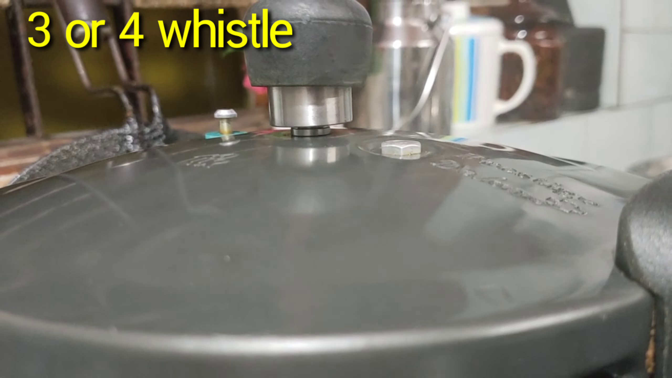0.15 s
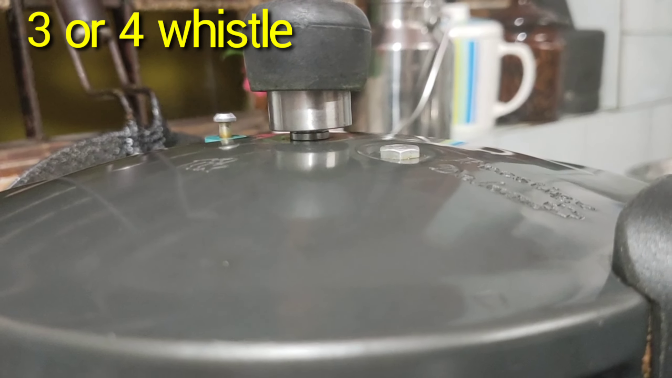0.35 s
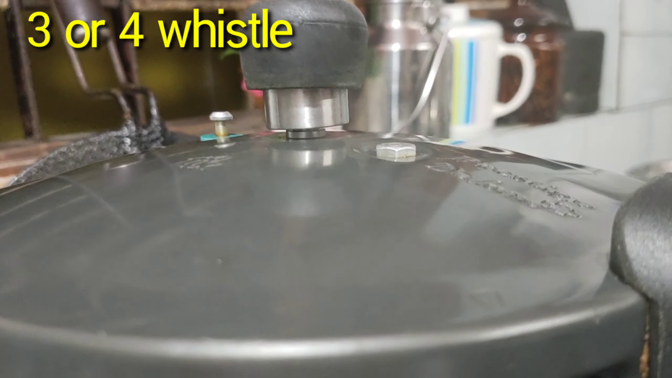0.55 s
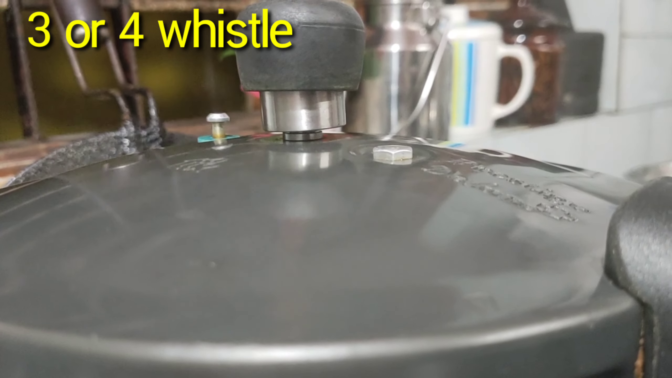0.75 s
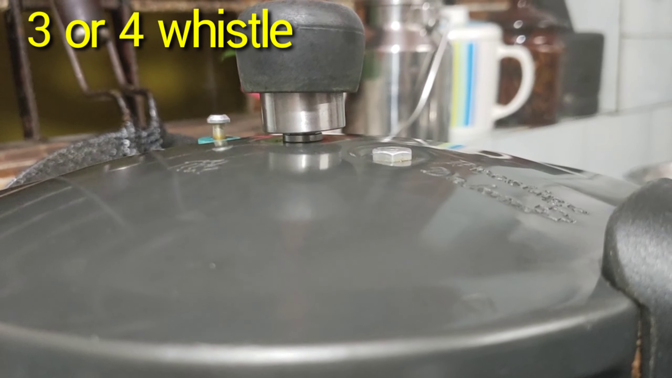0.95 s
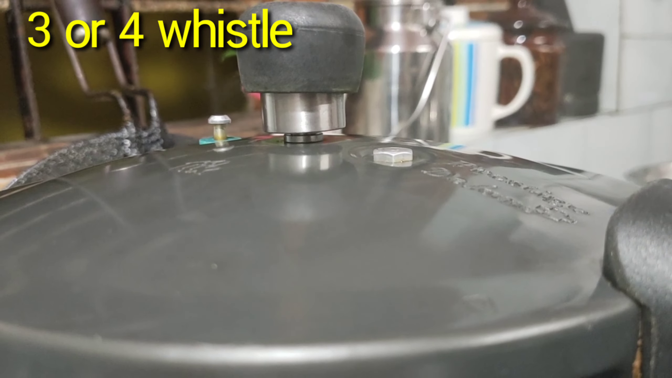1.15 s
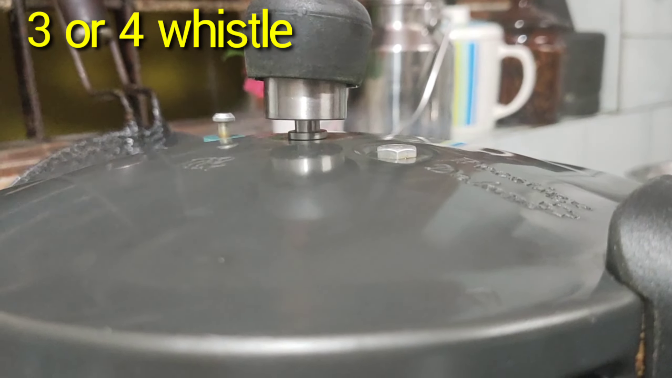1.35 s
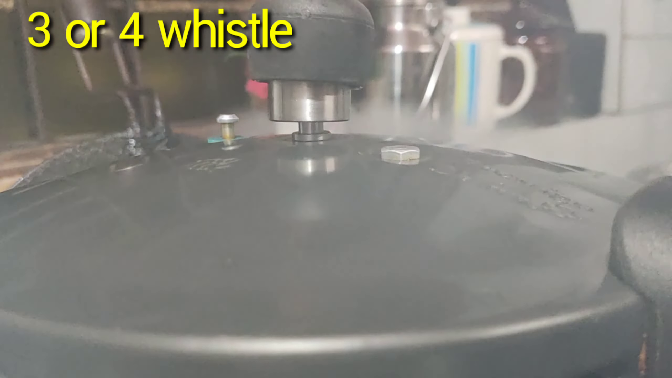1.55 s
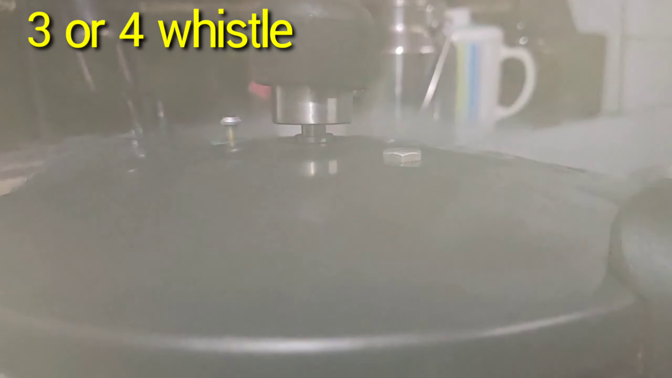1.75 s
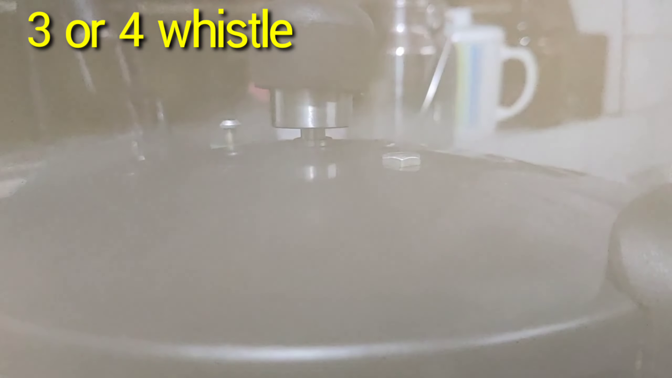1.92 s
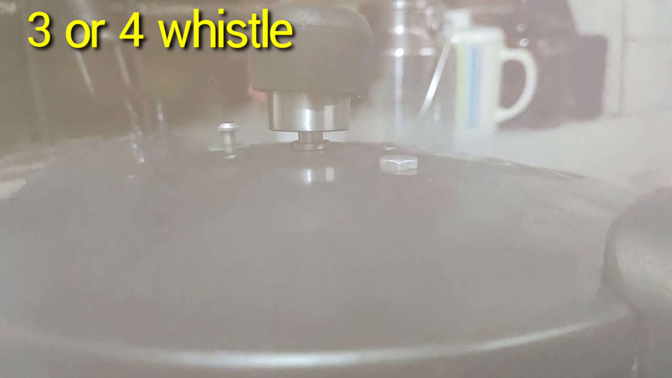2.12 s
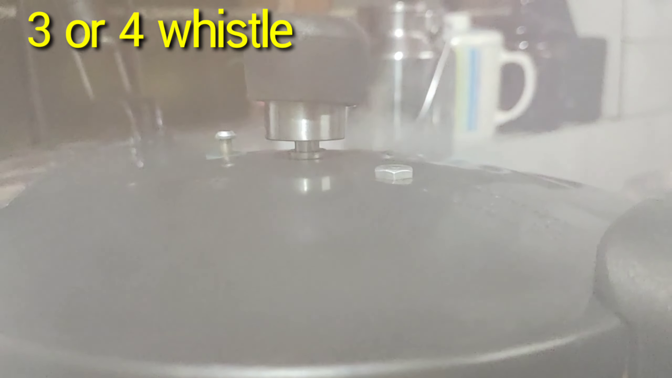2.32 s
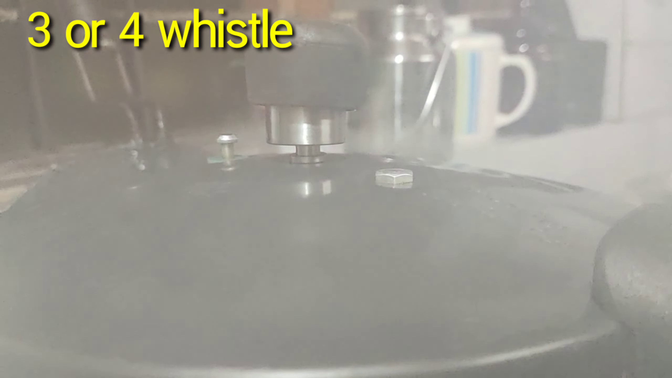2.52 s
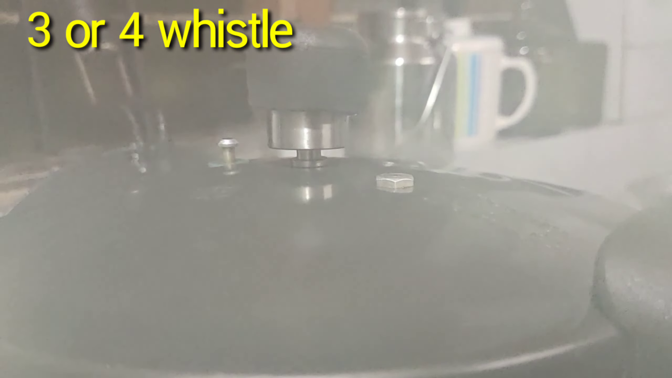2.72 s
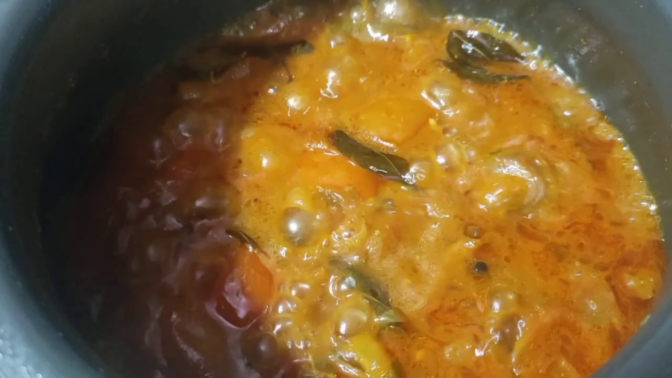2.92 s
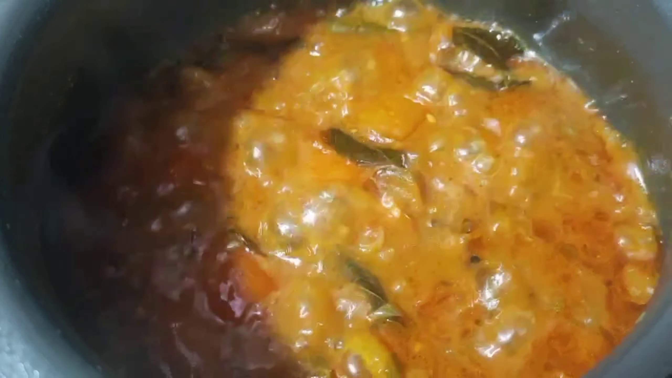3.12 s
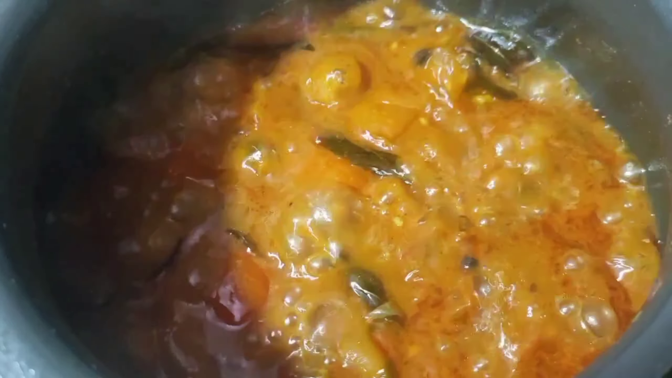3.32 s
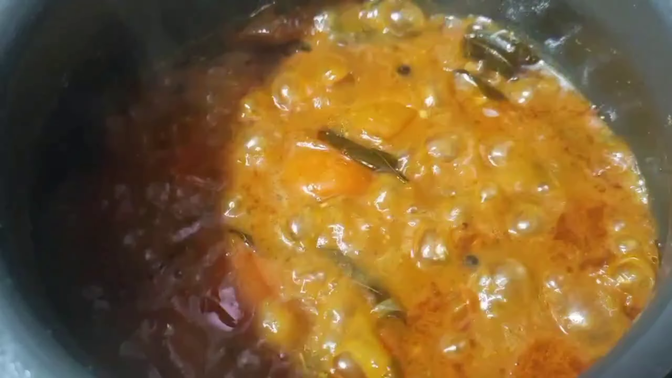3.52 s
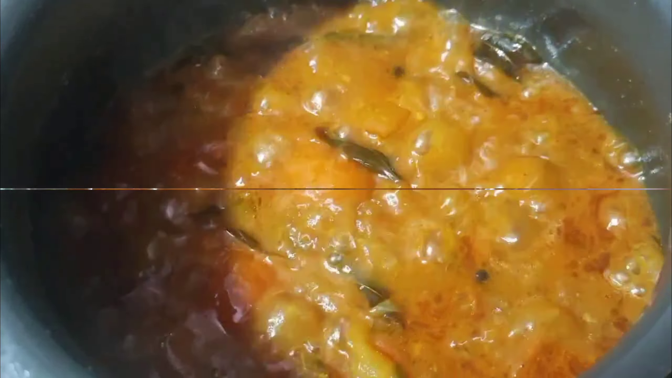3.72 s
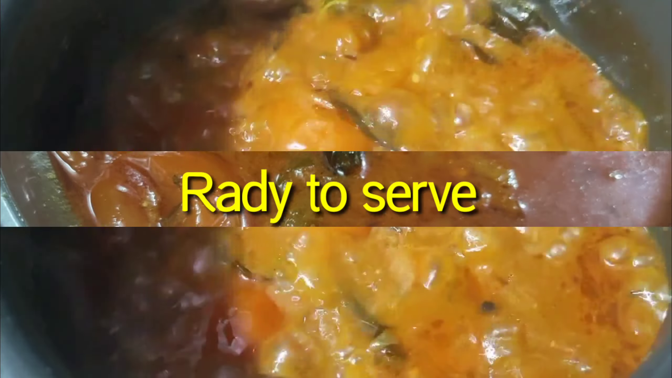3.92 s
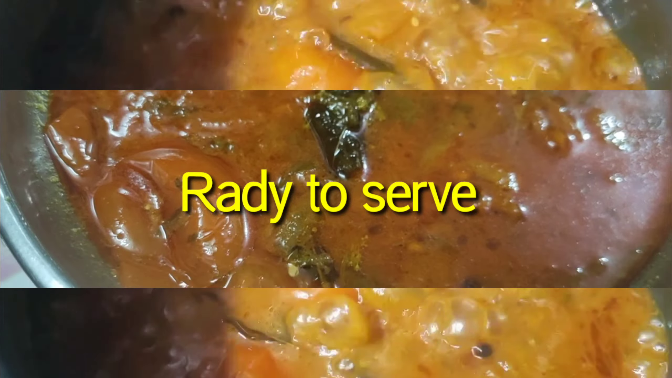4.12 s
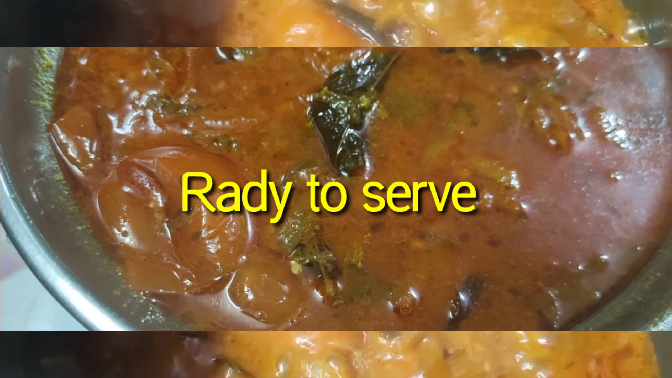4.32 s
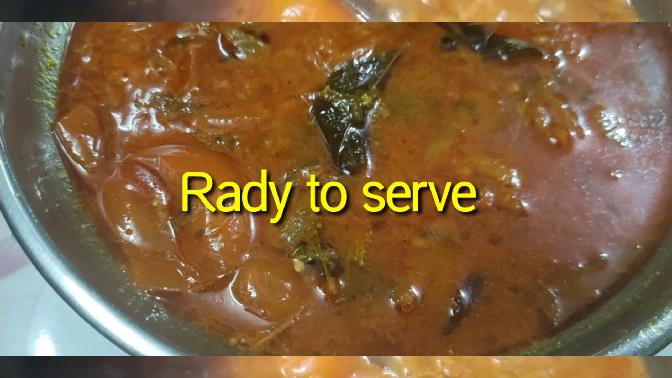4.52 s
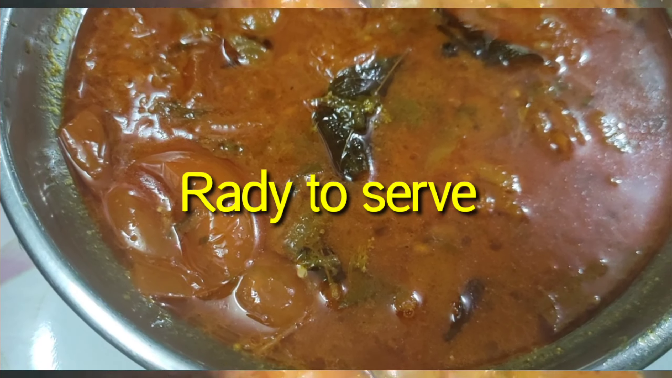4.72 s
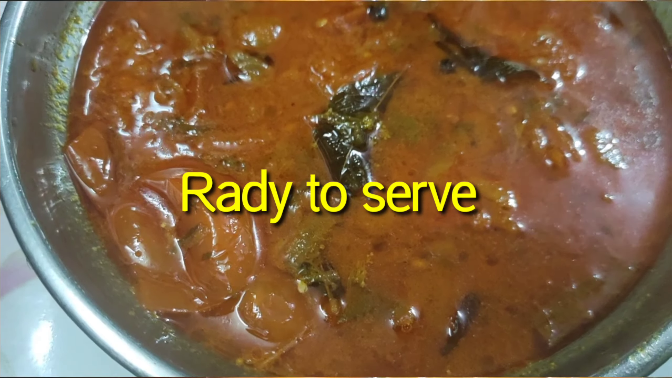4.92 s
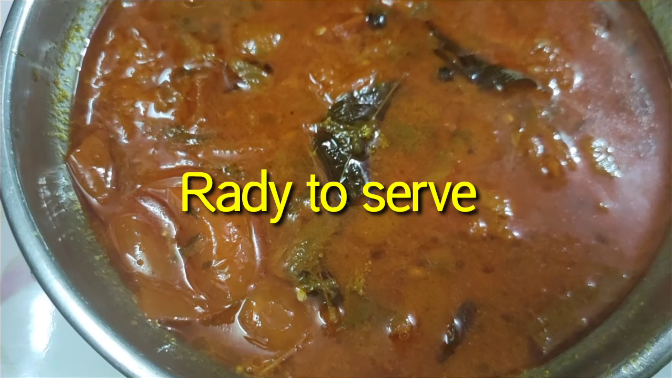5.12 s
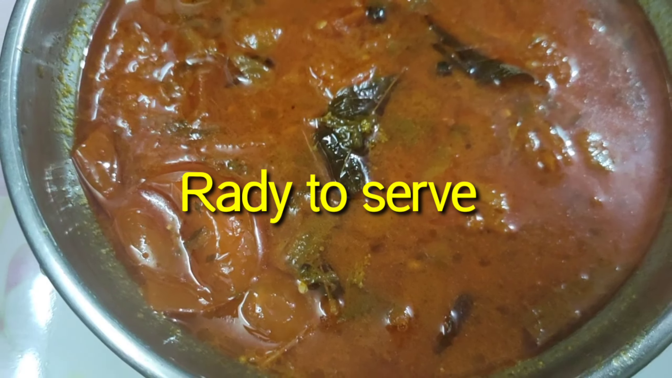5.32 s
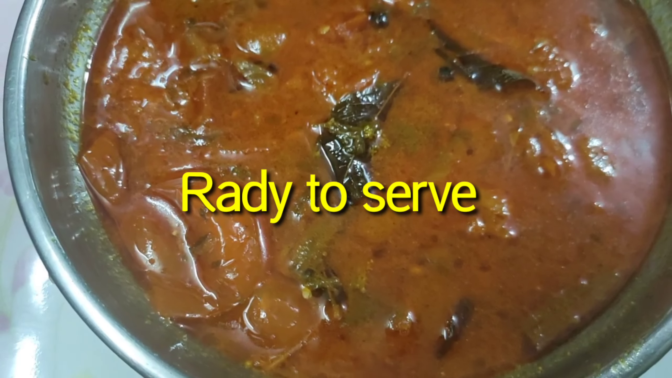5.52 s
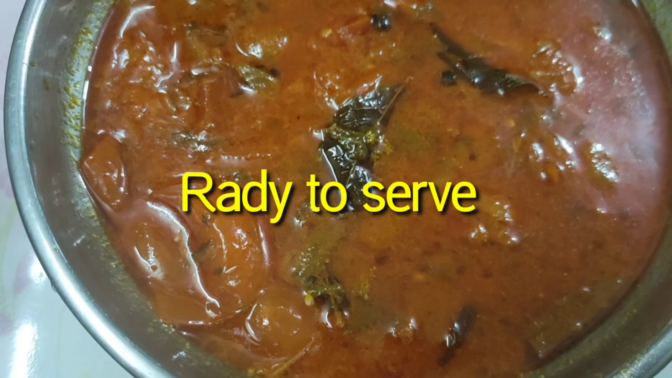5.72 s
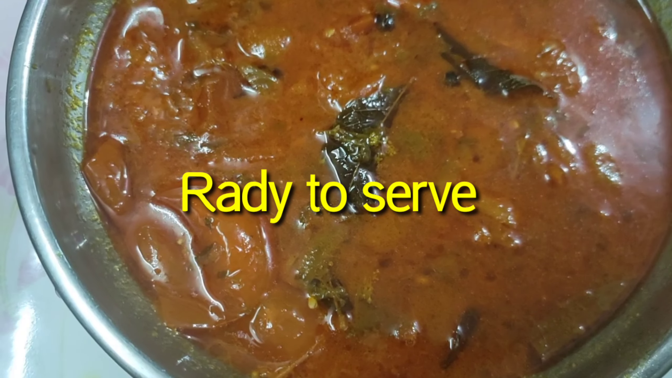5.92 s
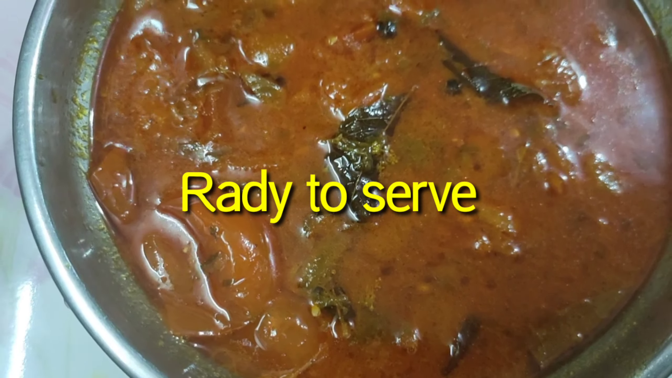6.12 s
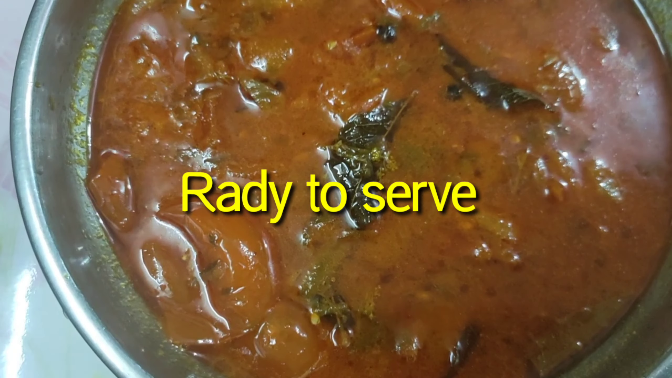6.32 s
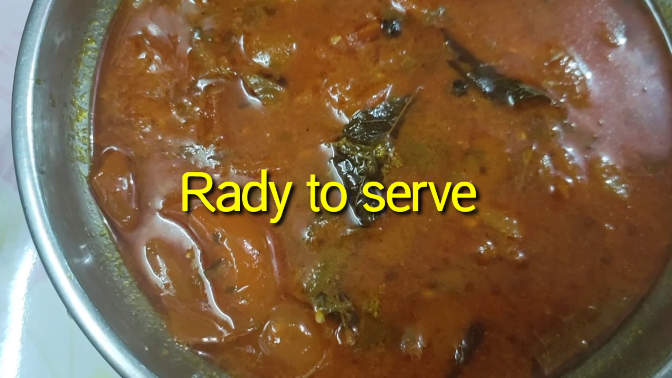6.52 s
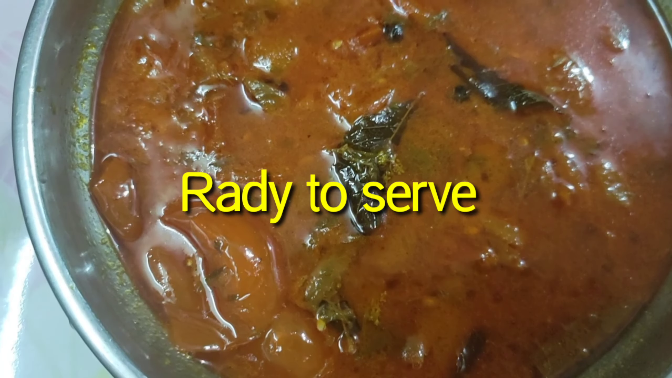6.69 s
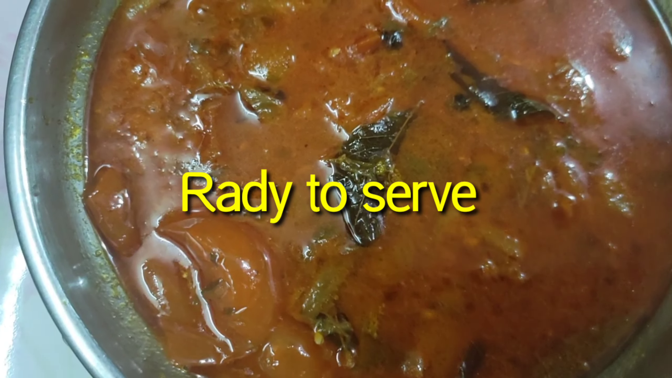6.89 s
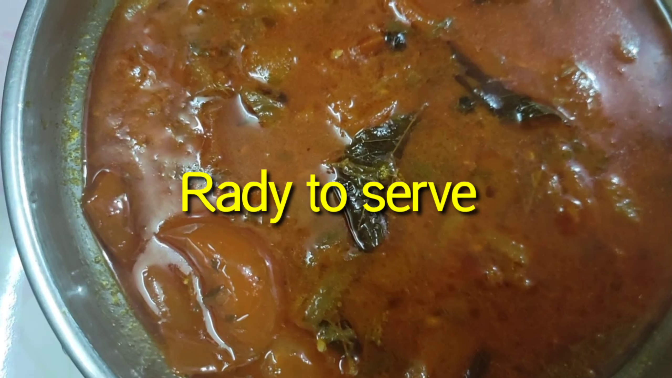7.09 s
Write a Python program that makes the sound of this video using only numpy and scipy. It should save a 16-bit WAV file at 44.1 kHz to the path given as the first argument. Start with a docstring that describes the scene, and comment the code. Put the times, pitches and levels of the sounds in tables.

```python
"""Pressure cooker and open curry pot

A pressure cooker hisses over a droning burner; its weight lifts with a puff and steam blows a shrill whistle.
The jet is coloured noise sounding the vent's resonances; the drone is noise in low resonances.
After a cut and a short silence, curry boils with plops and spits, each a ringing bubble, then fades.
Out in the street an engine hums and a horn toots three times, ever louder, both built from sines.
A fan hums throughout, and filtered noise makes the kitchen air and the stove flame.
"""
import sys
import numpy as np
from scipy import signal
from scipy.fft import rfft, irfft
from scipy.io import wavfile
from scipy.ndimage import uniform_filter1d

SR = 44100
rng = np.random.default_rng(int(sys.argv[2]) if len(sys.argv) > 2 else 0)


def output_pcm(signal):
    """Save a mono or channel-first signal as 16-bit PCM at the path in sys.argv[1].

    Samples are clipped to [-1, 1] before scaling.
    """
    pcm = np.clip(np.atleast_2d(signal).T, -1, 1) * 32767
    wavfile.write(sys.argv[1], SR, np.round(pcm).astype(np.int16))


N = 315315
TIME = np.arange(N) / SR
FREQS = np.maximum(np.arange(N // 2 + 1) * SR / N, 1)
CUTOFF_HZ = 15480   # top of the sound


def from_db(db):
    """Decibels to gain."""
    return 10 ** (np.asarray(db) / 20)


def rms_one(x):
    """Scale so that the middle of the stereo image has rms 1."""
    return x / np.sqrt(np.mean(np.atleast_2d(x).mean(axis=0) ** 2) + 1e-20)


def in_time(rows):
    """Each column of a curve at every sample."""
    s, *columns = np.transpose(rows)
    return [np.interp(TIME, s, c) for c in columns]


def at_hz(points, hz=FREQS):
    """Read a spectrum on a log-frequency axis."""
    f, value = np.transpose(points)
    return np.interp(np.log(hz), np.log(f), value)


def colour(points):
    """Gain of a spectrum, falling steeply past its ends."""
    below = 1 + (points[0][0] / FREQS) ** 8
    above = 1 + (FREQS / points[-1][0]) ** 8
    return from_db(at_hz(points)) / np.sqrt(below * above)


def resonances(peaks):
    """Gain of a set of resonances whose powers add."""
    power = 0
    for hz, width, db in peaks:
        detuning = (FREQS / hz - hz / FREQS) * hz / width
        power = power + from_db(db) ** 2 / (1 + detuning ** 2) ** 1.8
    return np.sqrt(power)


def filtered(x, gain):
    """Apply a gain per frequency."""
    return irfft(rfft(x) * gain, N)


def noise(gain, likeness):
    """Stereo noise of a given colour and left-right likeness; rms 1."""
    alike = np.clip(likeness, -.95, .999)
    mid = filtered(rng.standard_normal(N), gain)
    side = filtered(rng.standard_normal(N), gain * np.sqrt((1 - alike) / (1 + alike)))
    return rms_one(mid + side * [[1], [-1]])


def drift(rate):
    """Random wander of spread 1; a higher rate in Hz wanders faster."""
    return rms_one(filtered(rng.standard_normal(N), 1 / (1 + (FREQS / rate) ** 2)))


def ring(clicks, hz, t60):
    """A unit click sets a sine of starting height 1 ringing, 60 dB down after t60 seconds."""
    r, w = from_db(-60 / (t60 * SR)), 2 * np.pi * hz / SR
    return signal.lfilter([0, np.sin(w)], [1, -2 * r * np.cos(w), r * r], clicks + 1e-18)


def add(out, s, sound):
    """Mix a short stereo sound in at time s."""
    i = int(s * SR)
    out[:, i:i + sound.shape[-1]] += sound[:, :N - i]


def echoes(x, t60, wet_db):
    """Dense reflections that die away, different at each ear."""
    t = TIME[:int(t60 * SR)]
    tail = rng.standard_normal((2, len(t))) * from_db(-60 * t / t60)
    tail /= np.sqrt(np.sum(tail ** 2, axis=1, keepdims=True))
    return x + from_db(wet_db) * signal.fftconvolve(np.atleast_2d(x), tail, axes=1)[:, :N]


LIFT_S, LIFT_TAKES_S = 1.104, 0.097   # the weight starts to rise; time until the vent is open
WHISTLE_DB, HISS_DB, RUSH_DB = -21, -22, -38   # base levels, shifted over time below
WHISTLE_CATCH_DB = 31.5   # the whistle is this much weaker while the vent is barely open
GUST_DB, GUST_S = 7, 0.082   # extra rush around the moment the vent opens; its time constant
SINK_S, SINK_DB, SINK_TAKES_S = 3.028, 11, .045   # the blow sinks: when, how far at most, time constant
# steam leaking under the seated weight: (time [s], relative level [dB])
LEAK_FLOW = [(0, -27), (.05, -26), (.33, -26), (.44, -23.5), (.51, -26.5), (.62, -23), (.7, -24.5),
             (1.1, -24.5)]
# colour of the leak: (frequency [Hz], relative density [dB per Hz])
LEAK_HISS = [(250, -16), (500, -22.5), (1070, -14), (1300, -19.5), (1600, -18), (2650, -15.5), (3100, -7),
             (4200, -11), (5400, -7.5), (7900, -6.5), (9700, -12), (11600, -13), (13000, -5.5),
             (14300, -11), (15500, -7)]
# resonances of the narrow gap: (frequency [Hz], width [Hz], relative level [dB])
GAP_RESONANCES = [(4630, 170, -9), (5910, 160, -3), (6500, 60, -4.5), (6600, 80, -1.5), (7000, 140, -6),
                  (7330, 250, -5), (7820, 340, -2), (13100, 360, -4.5)]
# colours of the jet's hiss and low rush: (frequency [Hz], relative density [dB per Hz])
JET_HISS = [(880, -45.5), (1500, -16), (2050, -14), (2330, -4.5), (2520, -7), (3280, -1.5), (3580, -7),
            (4020, -11.5), (4660, -13.5), (5500, -15.5), (6400, -15.5), (6900, -13), (7350, -14.5),
            (7950, -13.5), (10200, -23.5), (11900, -23.5), (13300, -13.5), (14200, -15), (15500, -18.5)]
JET_RUSH = [(100, -22.5), (230, -13.5), (300, -9), (420, -9), (700, -5), (1400, -1), (1550, -1),
            (2000, -17)]
# resonances of the vent and the hollow weight: (frequency [Hz], width [Hz], relative level [dB])
VENT_RESONANCES = [(1927, 35, -12.5), (1997, 30, -14), (2240, 70, -15), (2370, 60, -8.5), (2690, 80, -8),
                   (2801, 55, -2), (2964, 40, -1), (3038, 40, -0.5), (3173, 40, 1.5), (3275, 90, 0.5),
                   (3390, 40, 2.5), (3616, 35, -8), (3830, 110, -11), (4009, 35, -13), (4138, 35, -13),
                   (4314, 50, -14), (4590, 80, -9), (4680, 80, -10.5), (4986, 35, -14)]
# shifts within the jet: (time [s], whistle above 2.5 kHz [dB], whistle below it [dB], hiss [dB], low rush [dB])
JET_BALANCE = [(1.3, -1.6, 4, 0.3, -0.5), (1.65, 0, -7.5, -0.7, 2), (1.8, -1.5, 5.5, 0, -3),
               (2.15, -1.2, 0.5, 0.5, -3.5), (2.45, -1.5, 0.5, 0.8, -2.5), (2.56, -0.5, -1.5, 0, 1.5),
               (2.8, 3, -2, 1, 1), (3.02, 2, -2.5, 1, 3.5)]
# stereo spread: (time [s], width factor [-])
STEAM_WIDTH = [(0, 1.2), (2.4, 1.05), (2.62, 0.12), (3.12, 0.083)]
# tilt of the stereo image: (frequency [Hz], left minus right [dB])
STEAM_BALANCE = [(60, -9.5), (99, -5.5), (160, 1), (270, 3), (450, 0), (740, 1), (1220, 1), (2010, -1),
                 (3330, 5.5), (5700, 2), (7500, 6.5), (8700, 1), (15000, 0)]
# phase between the sides: (frequency [Hz], lead of the left [radians])
STEAM_PHASE = [(200, -0.022), (1100, 0.55), (2300, 0.055), (3200, -0.65), (4500, -0.25), (7000, -0.36)]


def steam():
    """The thin leak gives way to the full jet, whose turbulence sounds the vent's resonances."""
    (leak_db,), (spread,) = in_time(LEAK_FLOW), in_time(STEAM_WIDTH)
    shrill_db, hollow_db, hiss_db, rush_db = in_time(JET_BALANCE)
    lifted = np.clip((TIME - LIFT_S) / LIFT_TAKES_S, 0, 1)   # 0 is seated, 1 is open
    sunk_db = SINK_DB * (1 - np.exp(-np.maximum(TIME - SINK_S, 0) / SINK_TAKES_S))
    gust_db = GUST_DB * np.exp(-np.abs(TIME - LIFT_S - LIFT_TAKES_S) / GUST_S)
    whistle_db = WHISTLE_DB - WHISTLE_CATCH_DB * (1 - lifted)

    gap = np.hypot(colour(LEAK_HISS), from_db(3.5) * resonances(GAP_RESONANCES))
    leak_likeness = at_hz([(1000, 0.9), (3000, 0.2), (7000, 0.19), (13000, 0.112)])
    leak = from_db(leak_db - 1.24 + 1.48 * drift(6.9)) * noise(gap, leak_likeness)

    vent = noise(resonances(VENT_RESONANCES), 0.88)
    hollow = filtered(vent, 1 / (1 + (FREQS / 2520) ** 48))
    tones = from_db(hollow_db) * hollow + from_db(shrill_db) * (vent - hollow)
    whistle = from_db(whistle_db + 0.7 * drift(32)) * tones

    roar = colour(JET_HISS) * from_db(at_hz([(1800, -3), (3100, -4.5), (5200, -1.0)]))
    hiss_likeness = at_hz([(2000, 0.35), (4500, 0.18), (7500, 0.51), (13000, 0.16)])
    hiss = from_db(HISS_DB + hiss_db + 0.83 * drift(27)) * noise(roar, hiss_likeness)
    rush = from_db(RUSH_DB + rush_db + gust_db + 1.4 * drift(30)) * noise(colour(JET_RUSH), 0.64)

    # reflections from the lid and the wall tiles comb the hiss
    combed = echoes(np.sqrt(1 - lifted ** 2) * leak + lifted * hiss, t60=.1, wet_db=-5.0)
    jet = (combed + lifted ** 2 * (whistle + rush)) * from_db(-sunk_db)
    centre = jet.mean(axis=0)
    jet = centre + spread * (jet - centre)   # the image narrows late in the blow
    half = np.array([[.5], [-.5]])   # half of each difference goes to each side
    return filtered(jet, from_db(at_hz(STEAM_BALANCE) * half) * np.exp(1j * at_hz(STEAM_PHASE) * half))


# the weight lifts: (time [s], relative level [dB])
PUFFS = [(1.192, -29.5), (1.201, -18.5)]
# dull tones of the thump: (frequency [Hz], relative level [dB], time to fall 60 dB [s])
PUFF_MODES = [(63.8, -6.5, 0.064), (120, -23, 0.058), (284, -4, 0.028), (710, 4.5, 0.0048),
              (1300, -16, .012)]


def puff():
    """The first gusts from under the weight thump dully, as clicks ringing short tones."""
    kicks = np.zeros(N)
    for s, db in PUFFS:
        kicks[int(s * SR)] = from_db(db)
    thump = sum(from_db(db) * ring(kicks, hz, t60) for hz, db, t60 in PUFF_MODES)
    return echoes(thump, t60=.12, wet_db=-8.5)


DRONE_DB, DRONE_DROP_DB, DRONE_FADE_S = -36.5, 19, 0.089   # the drone falls back once the vent is open
# resonances of the drone: (frequency [Hz], width [Hz], relative level [dB])
DRONE_PEAKS = [(67.3, 24, -3), (92, 22, -5), (129.3, 11, -0.5), (157, 9.8, 0.5), (178.7, 15, -5.5)]


def burner():
    """The flame drones in a few low resonances."""
    dropped = np.clip((TIME - LIFT_S - LIFT_TAKES_S) / DRONE_FADE_S, 0, 1)
    bed = from_db(-33.0) / (1 + (FREQS / 90) ** 2)
    return from_db(DRONE_DB - DRONE_DROP_DB * dropped) * noise(resonances(DRONE_PEAKS) + bed, 0.99)


def bubbling(spectrum, per_s, cycles, size_db, largest, clump_db):
    """Small bubbles burst at random, in clumps, each ringing a few cycles at its own pitch and place."""
    at = np.flatnonzero(rng.random(N) < per_s * from_db(clump_db * drift(14)) / SR)
    count = len(at)
    sizes = from_db(size_db * np.minimum(rng.exponential(1, count), largest)) * rng.choice([-1, 1], count)
    sizes = sizes * from_db(rng.normal(0, 3.4, count) * np.array([[1], [-1]]))   # place from left to right
    # the right ear is farther
    late = np.minimum(at + (rng.uniform(0, 0.00019, count) * SR).astype(int), N - 1)
    pitches = np.geomspace(spectrum[0][0], min(spectrum[-1][0], CUTOFF_HZ), 24)
    dealt, out = rng.integers(0, len(pitches), count), 0
    for k, hz in enumerate(pitches):
        clicks = np.zeros((2, N))
        mine = dealt == k
        clicks[0, at[mine]] = sizes[0, mine]
        clicks[1, late[mine]] = sizes[1, mine]
        # high bubbles are brief and cover a wide band, so they need more height
        out = out + hz * from_db(at_hz(spectrum, hz)) * ring(clicks, hz, cycles / hz)
    low_cut = signal.butter(2, spectrum[0][0] * 2.16, "high", fs=SR, output="sos")
    return rms_one(signal.sosfilt(low_cut, out))


OPENING_CYCLES = .55   # time constant of a bubble's onset, in cycles of its pitch


def bursts(rows, rise, crack_db, spray_db):
    """Single bubbles: the film snaps, the cavity rings and rises in pitch, and torn film spatters after it."""
    out, t = np.zeros((2, N)), TIME[:SR // 12]
    for s, db, hz, cycles in rows:
        age = t * hz / cycles   # at 1 the ring is 60 dB down
        lead = rng.normal(0.76, 0.45) * np.array([[.5], [-.5]])   # each bursts at its own place in the pot
        turns = np.cumsum(1 + rise * (np.minimum(age, 1) - .2)) / SR
        tone = np.sin(2 * np.pi * hz * turns + lead)
        band = signal.butter(2, [hz * .6, min(hz * 1.7, CUTOFF_HZ)], "band", fs=SR, output="sos")
        snap, *spray = rms_one(signal.sosfilt(band, rng.standard_normal((3, len(t))))) / np.sqrt(3)
        pop = (tone + from_db(crack_db) * snap) * from_db(-60 * age)
        spatter = np.array(spray) * from_db(spray_db - 60 * t / 0.089)
        opening = 1 - np.exp(-t * hz / OPENING_CYCLES)
        add(out, s, from_db(db) * opening * (pop + spatter))
    return out


PLOP_DB, SPIT_DB = -38.5, -47.5   # fine bubbling at 0 dB of vigour
SPIT_FOLLOWS = 1.0   # dB per dB of vigour
SPIT_CYCLES = 51   # a spit rings this many cycles until 60 dB down
KITCHEN_T60_S, KITCHEN_WET_DB = .22, -11
# vigour of the boil: (time [s], level [dB])
BOIL = [(3.3, 1), (3.85, -0.5), (4.28, -1.5), (4.38, -5), (4.95, -10), (5.05, -17)]
# colours of the fine plops and spits: (frequency [Hz], relative density [dB per Hz])
PLOP_COLOUR = [(250, -23), (450, -3), (560, -11), (660, 9.5), (850, -0.5), (1140, -1), (1470, -5.5),
               (1840, -31), (2300, -13), (3200, -35)]
SPIT_COLOUR = [(2000, 6), (3400, -7), (5600, -6.5), (7700, -18.5), (12000, -24.5), (15500, -25)]
# the biggest bubbles: (time [s], relative peak [dB], pitch around which it rises [Hz], ring [cycles])
PLOPS = [(3.301, -21, 1010, 14), (3.329, -24, 824, 11), (3.358, -24, 1360, 19), (3.408, -23.5, 700, 9.6),
         (3.411, -20.5, 1550, 22), (3.424, -22, 790, 23), (3.451, -19, 1070, 13), (3.486, -25, 842, 13),
         (3.489, -25, 1400, 22), (3.525, -24, 1270, 25), (3.568, -24, 680, 14), (3.586, -18, 900, 7.7),
         (3.594, -19, 1050, 11), (3.607, -30, 890, 12), (3.657, -23.5, 680, 13), (3.659, -21.5, 1250, 17),
         (3.666, -18.5, 750, 18), (3.7, -21, 980, 16), (3.708, -21.5, 1050, 18), (3.755, -10.5, 1010, 9.5),
         (3.786, -17.5, 867, 15), (3.813, -14.5, 1470, 25), (3.862, -22, 960, 13), (3.879, -17, 900, 12),
         (3.892, -15, 1020, 20), (3.939, -21, 670, 18), (3.959, -16, 840, 12), (3.977, -17.5, 1220, 19),
         (4.018, -23, 640, 12), (4.051, -13.5, 900, 10), (4.059, -21, 1080, 14), (4.078, -13.5, 1430, 25),
         (4.08, -23, 800, 13), (4.128, -26, 1000, 13), (4.164, -20, 1050, 34), (4.181, -19, 1000, 22),
         (4.227, -22, 624, 11), (4.248, -17, 990, 19), (4.282, -20, 990, 21), (4.372, -30, 781, 10),
         (4.49, -26, 660, 6), (4.508, -20.5, 935, 41), (4.619, -30.5, 1250, 36), (4.652, -26.5, 705, 14),
         (4.668, -27, 1090, 13), (4.688, -28.5, 1060, 25), (4.761, -33, 745, 12), (4.861, -28, 1300, 21),
         (4.936, -31.5, 1250, 24)]
# the sharpest spits: (time [s], relative peak [dB], pitch around which it rises [Hz])
SPITS = [(3.357, -27, 4600), (3.388, -21, 4950), (3.409, -21.5, 2190), (3.566, -22, 5460),
         (3.627, -26.5, 5500), (3.668, -31, 2800), (3.703, -28, 5000), (3.775, -30, 4620),
         (3.813, -25.5, 2300), (4.035, -24.5, 5820), (4.078, -31, 2270), (4.098, -20, 3630),
         (4.163, -13, 3650), (4.265, -18.5, 4770), (4.373, -34, 6230), (4.5463, -24.5, 2920),
         (4.608, -34, 4850), (4.66, -32.5, 3240), (4.681, -34, 5910)]


def curry():
    """Thick plops and fine spitting, a little to the left, with the echo of the pot and the kitchen."""
    vigour_db, = in_time(BOIL)
    fade, = in_time([(4.98, 0.97), (5.05, 0.022)])
    plops = from_db(PLOP_DB + vigour_db) * bubbling(
        PLOP_COLOUR, per_s=500, cycles=20, size_db=1.5, largest=2.0, clump_db=1.37)
    spits = from_db(SPIT_DB + SPIT_FOLLOWS * vigour_db) * bubbling(
        SPIT_COLOUR, per_s=740, cycles=64, size_db=1.4, largest=4.5, clump_db=2.5)

    thick = signal.butter(2, [500, 2200], "band", fs=SR, output="sos")
    big = signal.sosfilt(thick, bursts(PLOPS, rise=0.49, crack_db=-19.0, spray_db=-18.5))
    big = from_db(1.5) * echoes(big, t60=.04, wet_db=-7.5)
    spit_rows = [(*row, SPIT_CYCLES) for row in SPITS]
    sharp = from_db(-0.1) * bursts(spit_rows, rise=0.1, crack_db=-14.0, spray_db=-16.5)

    pot = fade * (plops + spits + sizzle(vigour_db)) + big + sharp
    return echoes(pot, KITCHEN_T60_S, KITCHEN_WET_DB) * from_db([[1.3], [-1.7]])


SIZZLE_DB, SNAPS_PER_S = -53, 900   # steady level at 0 dB of vigour; rate of snaps
SIZZLE_RISE_S, SIZZLE_FADE_S = .004, 0.011   # rise time and fade time constant of a flare
# splashes sizzle on the hot wall: (time [s], relative level [dB])
SIZZLES = [(3.563, -44), (3.773, -31.5), (4.032, -43), (4.162, -42), (4.177, -54), (4.37, -41),
           (4.678, -37.5), (4.76, -49), (4.982, -46.5)]
# colour of the sizzle: (frequency [Hz], relative density [dB per Hz])
SIZZLE_COLOUR = [(2500, 2.5), (5500, 2), (8500, -4.5), (12300, -9), (13200, -4), (15500, -4)]


def sizzle(vigour_db):
    """Curry fries on the hot wall in countless tiny snaps, flaring up wherever a splash lands."""
    flare = 0
    for s, db in SIZZLES:
        rise = np.clip((TIME - s) / SIZZLE_RISE_S, 0, 1)
        flare = flare + from_db(db) * rise * np.exp(-np.maximum(TIME - s, 0) / SIZZLE_FADE_S)
    happens = rng.random(N) < SNAPS_PER_S / SR
    heights = from_db(3.6 * np.minimum(rng.exponential(1, N), 4))
    snaps = happens * heights * rng.choice([-1, 1], N)
    crackle = rms_one(filtered(echoes(snaps, t60=.012, wet_db=10.0), colour(SIZZLE_COLOUR)))
    return (from_db(SIZZLE_DB + vigour_db) + flare) * crackle


HORN_HZ = 388.3   # base pitch
HORN_RESONANT, HORN_RESONANT_DB = 9, -2   # the resonant multiple and its level at the start of a toot
HORN_SWELL_DB = 12.5   # its growth through a toot
STREET_T60_S, STREET_DB = 0.65, -5   # lingering echo of each partial
# horn toots: (start [s], end [s], relative level [dB])
TOOTS = [(4.44, 4.63, -60.5), (4.73, 4.9, -52.5), (5.111, 5.274, -44)]
# steady partials: (multiple of the base pitch [-], relative level [dB])
HORN_PARTIALS = [(1, -11), (7, -5), (8, -1.5), (10, -7.5), (11, -20), (12, -22), (13, -25), (14, -27),
                 (22, -19), (23, -23), (24, -29), (25, -32), (26, -34)]


def horn():
    """A buzzing diaphragm far off; its resonant partial swells in each toot and street echoes prolong it."""
    held, swelling = 0, 0
    for start, end, db in TOOTS:
        on = from_db(db) * ((TIME > start) & (TIME < end))
        held = held + on
        swelling = swelling + on * from_db(HORN_SWELL_DB * np.clip((TIME - start) / (end - start), 0, 1))
    phase = 2 * np.pi * np.cumsum(HORN_HZ * (1 + 0.0011 * drift(45))) / SR
    r = from_db(-60 / (STREET_T60_S * SR))

    def partial(k, gate):
        """The direct tone, and its echo that builds up and dies away between the houses, wavering."""
        direct = uniform_filter1d(gate, SR // 22) * np.sin(k * phase + 0.45 * drift(28))
        lingering = signal.lfilter([1 - r], [1, -r], gate) * np.cos(k * phase + 1.2 * drift(26))
        return (direct + from_db(STREET_DB) * lingering) * from_db(2.2 * drift(20))

    buzz = sum(from_db(db) * partial(round(k), held) for k, db in HORN_PARTIALS)
    resonant = from_db(HORN_RESONANT_DB) * partial(HORN_RESONANT, swelling)
    return echoes(buzz + resonant, t60=0.55, wet_db=-5.0)


REV_RAMP_S, BOOM_DB = .1, -4.5   # rise and fall of a swell; the boom relative to the note
# the engine swells: (start [s], end [s], mean level [dB], mean firing rate [Hz])
REVS = [(3.251, 4.3, -47, 82.2), (4.605, 5.62, -44, 77.3), (6.674, 7.3, -50, 73.6)]


def engine():
    """Only the firing note of an engine, faint overtones and a low boom come through the walls."""
    out, wander, boom = 0, 1.465 * drift(6.3), noise(resonances([(62.5, 8.8, 0)]), 0.98)
    for start, end, db, hz in REVS:
        swell = np.clip(np.minimum(TIME - start, end - TIME) / REV_RAMP_S + .5, 0, 1)
        phase = 2 * np.pi * np.cumsum(hz + wander) / SR
        overtones = np.sin(2 * phase) + np.sin(3 * phase)
        note = rms_one(np.sin(phase) + from_db(-25.0) * overtones)
        out = out + from_db(db) * swell * (note + from_db(BOOM_DB) * boom)
    return out * from_db(0.63 * drift(23))


HUM_HZ, HUM_DB = 65.2, -55.5   # mean pitch and level of the fan


def hum():
    """A fan motor hums as a sine, wavering in pitch and loudness."""
    phase = 2 * np.pi * np.cumsum(HUM_HZ + 1.22 * drift(8.7)) / SR
    return from_db(HUM_DB) * rms_one(np.sin(phase) * (1 + 0.57 * drift(22)))


STOVE_DB, STOVE_FOLLOWS = -43, 1   # level at 0 dB of vigour; dB per dB of vigour
# kitchen air: (time [s], relative murmur of the street [dB], relative hiss [dB])
AIR = [(5.05, -55, -65.5), (6.12, -51.5, -66), (7.15, -55.5, -71)]
# colours of the murmur, hiss and flame under the open pot: (frequency [Hz], relative density [dB per Hz])
AIR_LOW = [(20, -15), (30, -14), (45, -8.5), (100, -15.5), (135, -18), (177, -24), (310, -15.5), (400, -16),
           (700, -23.5), (980, -16.5), (1470, -27), (2430, -27), (3000, -27.5)]
AIR_HISS = [(1500, -8), (1900, -26), (2430, -0.5), (3860, -7), (5300, -3.5), (9700, -26), (15000, -32)]
STOVE = [(50, -13), (90, 1.5), (140, -3), (240, -19.5), (380, -1), (450, -32), (600, 0.5)]


def kitchen_air():
    """Dull street noise and soft hiss, as coloured noise; the stove flame dies down with the boil."""
    low_db, hiss_db = in_time(AIR)
    stove_db = STOVE_DB + STOVE_FOLLOWS * in_time(BOIL)[0]
    street_likeness = at_hz([(100, 0.94), (400, 0.69), (2000, 0.029)])
    street = from_db(low_db + 2.5 + 0.27 * drift(5.3)) * noise(colour(AIR_LOW), street_likeness)
    hiss = from_db(hiss_db + 5.5) * noise(colour(AIR_HISS), 0.92)
    flame = from_db(stove_db) * noise(colour(STOVE), 0.99)
    return street + hiss + flame


CUT_OUT_S, CUT_IN_S = 3.121, 3.297   # the cooker stops; the open pot starts


def scene():
    """The cooker, a moment of silence, then the open pot."""
    fan = hum()
    cooker = steam() + burner() + puff() + fan
    open_pot = curry() + kitchen_air() + engine() + horn() + fan
    return cooker * (TIME < CUT_OUT_S) + open_pot * (TIME > CUT_IN_S)


def record(dry):
    """The top is cut steeply."""
    return signal.sosfilt(signal.ellip(12, .1, 90, CUTOFF_HZ, fs=SR, output="sos"), dry)


dry = scene()
out = record(dry)
output_pcm(out)
```